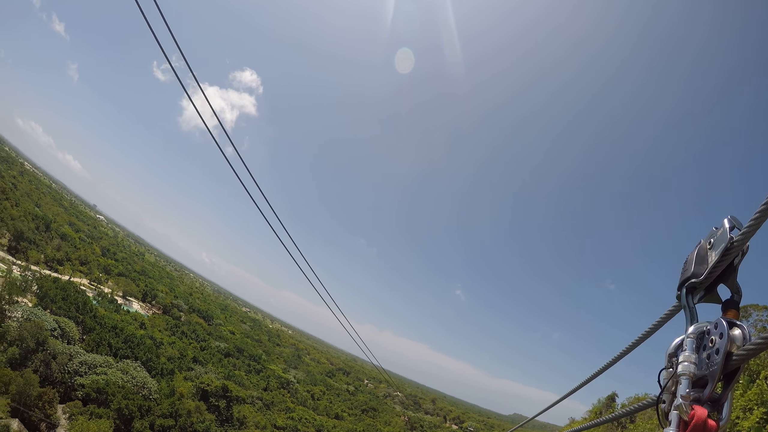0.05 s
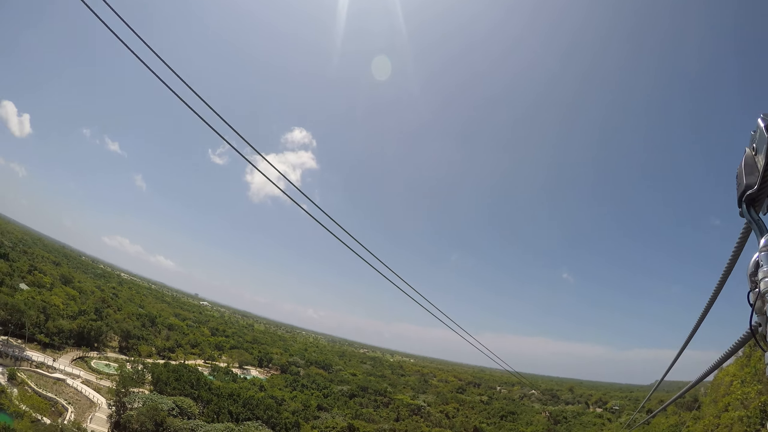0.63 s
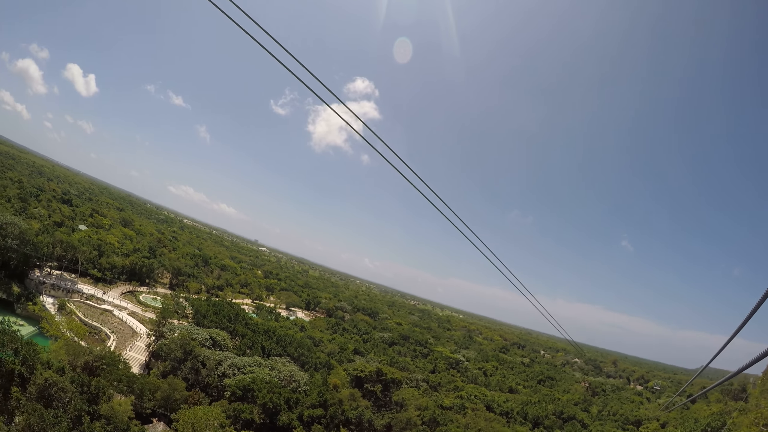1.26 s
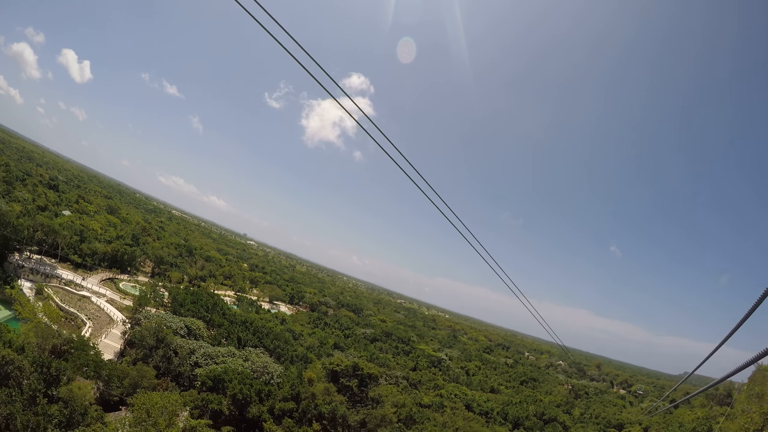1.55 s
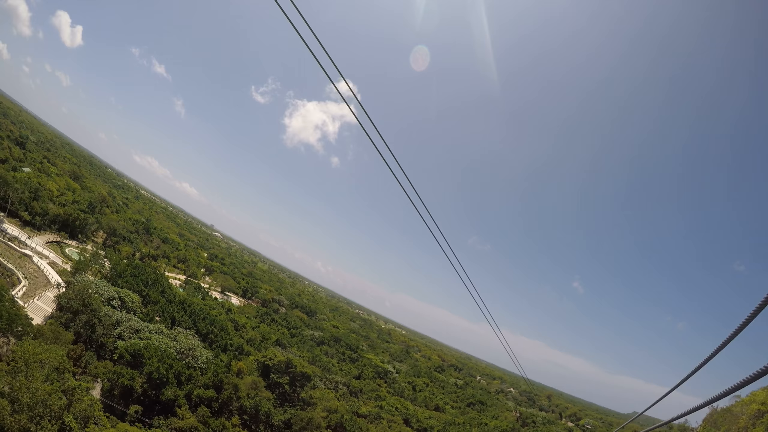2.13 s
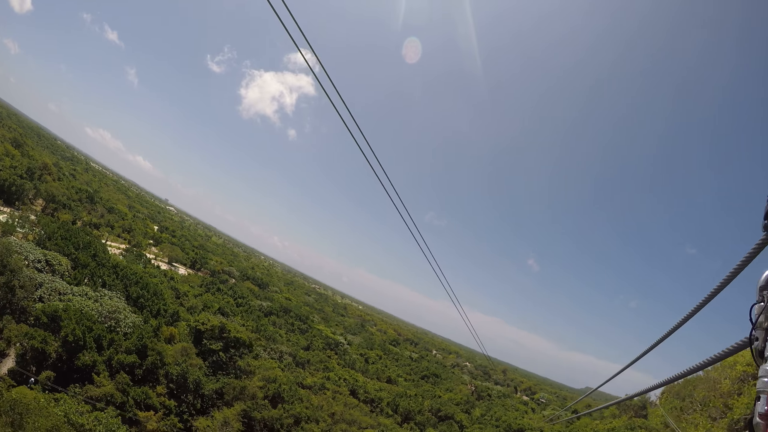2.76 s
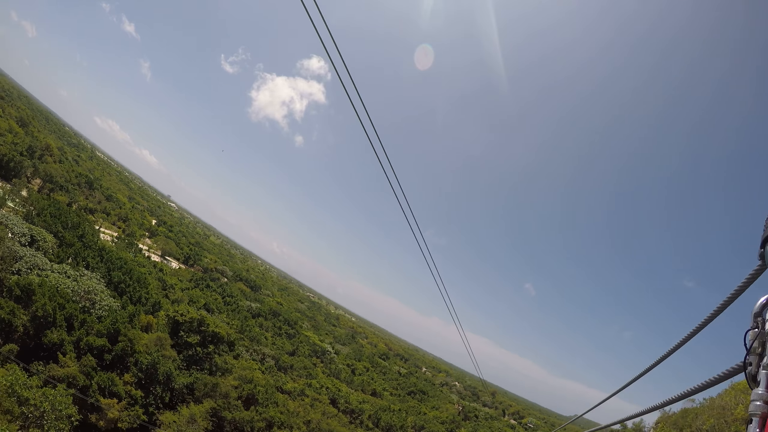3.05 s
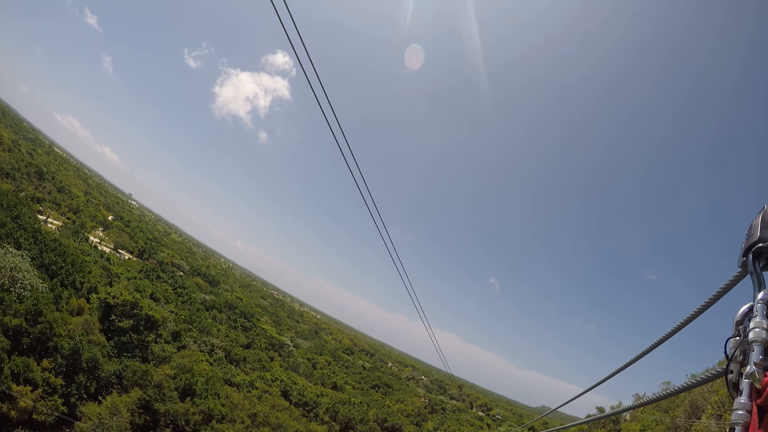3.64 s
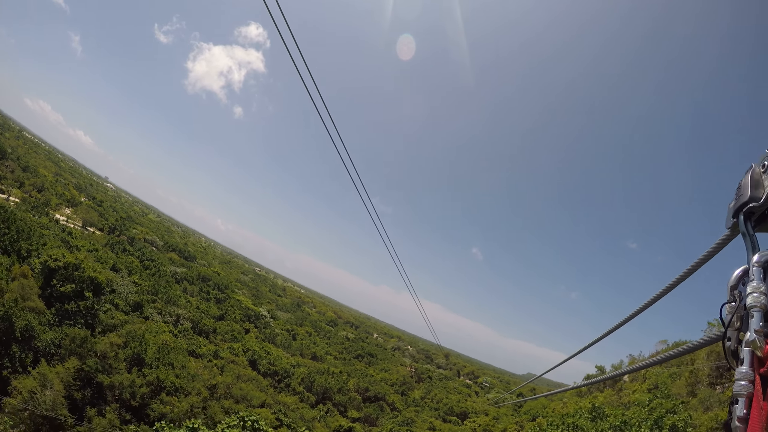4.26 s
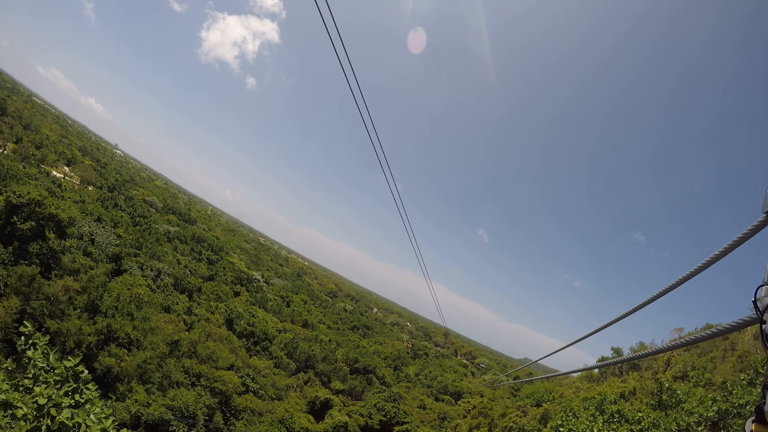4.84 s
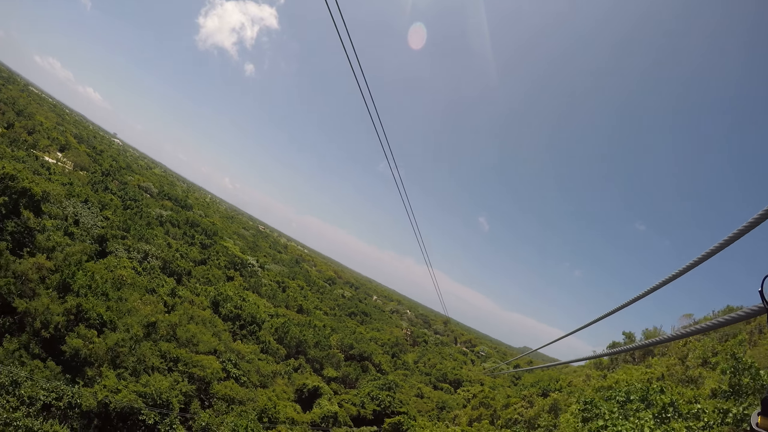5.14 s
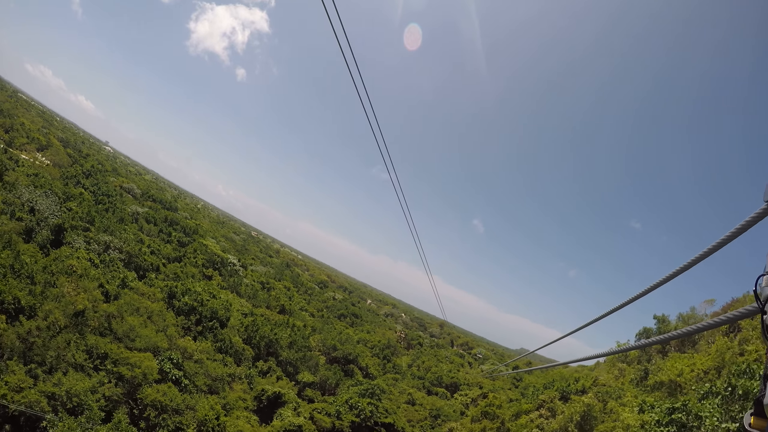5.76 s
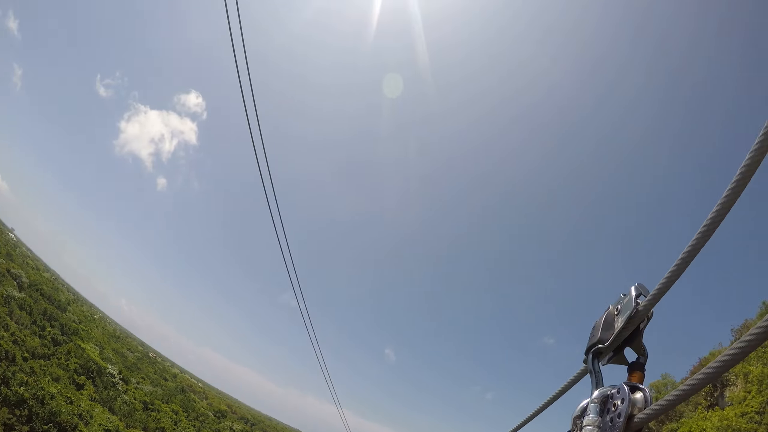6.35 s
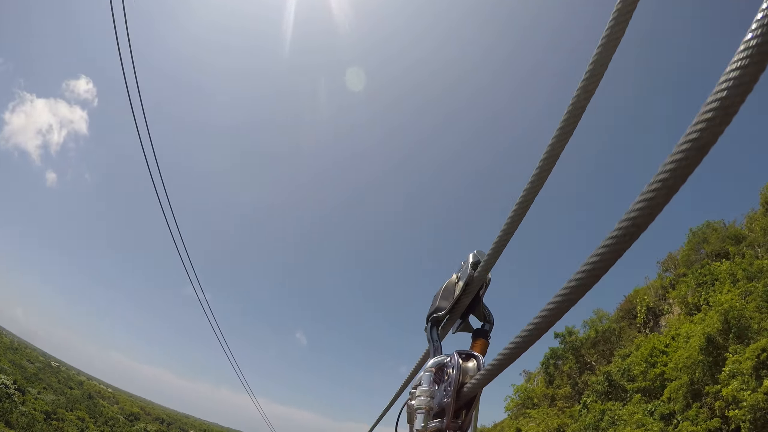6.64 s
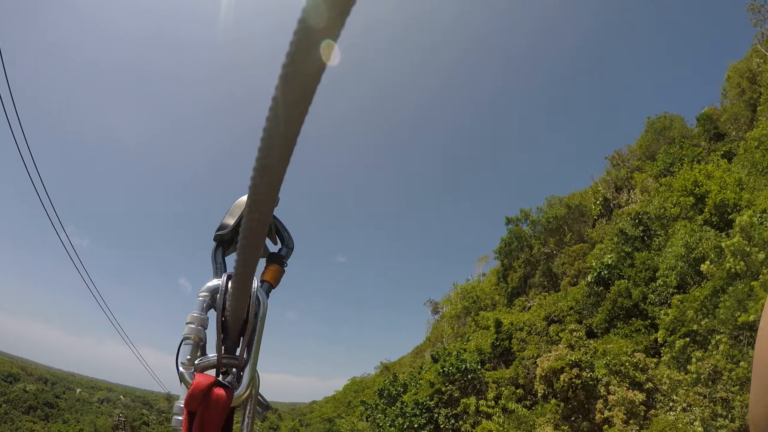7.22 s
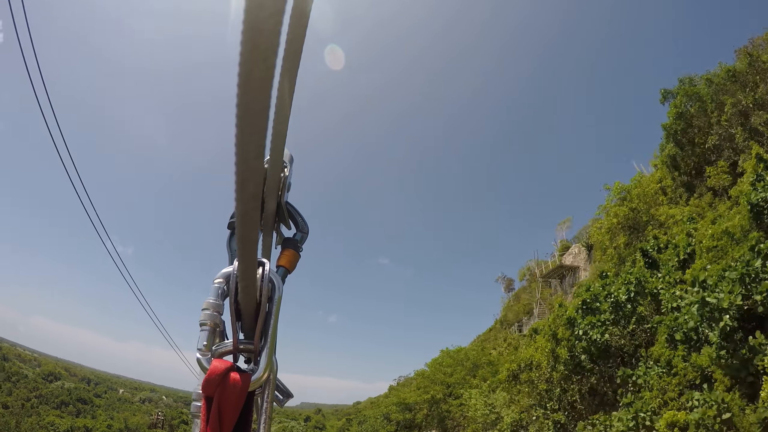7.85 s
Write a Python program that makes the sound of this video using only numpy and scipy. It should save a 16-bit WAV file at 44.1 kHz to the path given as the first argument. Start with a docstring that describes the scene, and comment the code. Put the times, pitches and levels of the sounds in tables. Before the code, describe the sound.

A zip line trolley rolls fast along a steel cable, making a loud, continuous, hissing metallic whirr. A thin, faint note rises in pitch as it gathers speed. After about a second, wind starts to thump and rush in uneven gusts on the rider's helmet microphone. Near the end the whirr shifts in tone as the head turns toward the pulley. The sound is close and outdoors.

```python
"""On a zip line, a rider gathers speed. The trolley's wheels roll on a cable of twisted steel strands
and shake the trolley's frame, which whirrs. The passing strands also sing a faint rising note over
the drone of the taut cable. A helmet camera swings round to face the trolley, which changes the
whirr's tone, while the wind thumps and rushes on its single microphone."""
import sys
import numpy as np
from scipy.fft import rfft, irfft, next_fast_len
from scipy.io import wavfile
from scipy.ndimage import uniform_filter1d, map_coordinates

SR = 44100
rng = np.random.default_rng(int(sys.argv[2]) if len(sys.argv) > 2 else 0)


def log_audio(samples):
    """Write samples as a 16-bit WAV file to the path given in sys.argv[1]."""
    # one column per channel
    frames = np.atleast_2d(samples).T
    # limit to full scale, then quantise
    limited = np.clip(frames, -1, 1)
    pcm = np.round(limited * 32767).astype(np.int16)
    wavfile.write(sys.argv[1], SR, pcm)


N = 347949

# Where the trolley is as the head turns. Each row: time in seconds, degrees to the right of the lens.
TROLLEY_ANGLE = [(0, 50), (.45, 62), (1, 69), (2.3, 68), (3.1, 64.5), (4, 53.5), (4.4, 57.5), (5, 61.5),
                 (5.7, 61.5), (6, 58), (6.25, 52), (6.5, 27), (6.66, 13), (6.86, 6), (7.02, -8),
                 (7.25, -15)]


def trolley(strands):
    """The rolling wheels shake the frame into a whirr, whose highest hiss sputters a little."""
    full_db, start_drop_db, build_seconds = -16.5, 2.5, 0.37
    whirr_db = full_db - start_drop_db * (1 - ramp(0, build_seconds))
    force = rolling_wheels(strands) + fine_wires(strands)
    whirr = helmet_echo(whirr_swells(ringing_frame(force)))
    hiss = filtered(whirr, lambda hz: 1 - 1 / (1 + (hz / 11000) ** 24))
    sputter_db = wobble(130) + .4 * wobble(25)
    return amp(whirr_db) * (whirr + hiss * (amp(sputter_db) - 1))


def rolling_wheels(strands):
    """The wheels feel ever new bumps on the cable, plus their own marks that come round each turn."""
    marks_share, tick_db, ticks_per_second = .17, -13.5, 300
    marks = np.zeros(N)
    for strands_per_turn in (12, 12 + 1 / np.pi):  # two wheels, slightly unequal
        rim = rng.standard_normal(576)
        place_on_rim = strands / strands_per_turn % 1 * len(rim)
        marks += map_coordinates(rim, [place_on_rim], mode="grid-wrap")
    bumps = np.sqrt(marks_share) * unit(marks) + np.sqrt(1 - marks_share) * rng.standard_normal(N)
    # Single wires tick under the wheel, and the load flutters.
    ticks = rng.standard_normal(N) * (rng.random(N) < ticks_per_second / SR)
    load_db = 0.49 * wobble(350) + 0.34 * wobble(25)
    return unit((bumps + amp(tick_db) * unit(ticks)) * amp(load_db))


def fine_wires(strands):
    """The fine wires in each strand pass under the wheels, adding fuzzy tones that rise with speed."""
    # Each row: pitch as a multiple of the strand rate, width in Hz, level in dB within the wheels' force.
    tones = [(2, 24, -31), (2.48, 26, -35), (3.22, 55, -26), (4.11, 60, -30.5), (4.3, 110, -25),
             (4.95, 45, -31)]
    force = np.zeros(N)
    for multiple, width, db in tones:
        level = amp(db + 1.4 * wobble(width + 8))
        force += level * np.sin(2 * np.pi * multiple * strands + 0.62 * wobble(2 * width))
    return force


def ringing_frame(force):
    """The frame rings at its own pitches; how strongly each is heard depends on the trolley's angle."""
    # Five angles of the trolley, in degrees to the right of the lens.
    angles = [-19, 6, 28, 50, 74]
    # The frame's rings. Each row: pitch in Hz, width in Hz, then relative level in dB at each angle.
    rings = [(933, 360, -31.5, -20.5, -31, -24, -27.5), (1068, 140, -46, -39, -30, -29, -32),
             (1435, 350, -31.5, -22, -25, -29.5, -35), (1707, 310, -21, -23, -30, -25, -28),
             (1962, 190, -15.5, -24, -23, -25, -26), (2163, 174, -14, -21, -18, -21, -18.5),
             (2340, 200, -10.5, -13, -19, -20.5, -19), (2714, 790, -9.5, -13.5, -19, -17.5, -15.5),
             (3108, 330, -6.5, -5, -16, -14.5, -29), (3422, 300, -6.5, -4, -8, -7.5, -12),
             (3660, 296, -15, -15, -10, -6, -5.5), (3900, 340, -27, -11, -5.5, -8.5, -11),
             (4255, 790, -6.5, -9.5, -22.5, -15.5, -15), (5070, 1020, -6.5, -9.5, -6.5, -14.5, -9),
             (5502, 490, -5.5, -15, -6, -9.5, -2.5), (6233, 570, -26, -15, -16, -6, -8),
             (6680, 510, -11.5, -23, -10, -25, -33), (7010, 540, -20, -7.5, -12, -13.5, -15.5),
             (7700, 1300, -34, -9, -29, -18.5, -17), (8640, 870, -19, -31, -26, -13.5, -20.5),
             (9280, 560, -25, -30, -13.5, -15, -40), (10030, 700, -27, -21, -28, -18, -26.5),
             (10490, 610, -23, -26, -24, -25.5, -26), (11370, 990, -27, -28.5, -32, -40, -39),
             (12200, 1330, -31, -27.5, -26, -25.5, -30), (13180, 540, -29, -31, -33, -39, -43),
             (14700, 1690, -32, -31, -22, -29, -30)]
    angle, = curves(TROLLEY_ANGLE)
    centre, width, *levels = np.transpose(rings)

    def response(hz):
        power = amp(levels) ** 2 / width @ resonance(hz, centre[:, None], width[:, None])
        return np.sqrt(power / power.mean(axis=1, keepdims=True))

    # Blend the sounds for the two nearest angles.
    shares = np.array([np.interp(angle, angles, side) for side in np.eye(len(angles))])
    return np.sum(shares * filtered(force, response), axis=0)


def whirr_swells(whirr):
    """Three bands of the whirr, near 2.2, 3.65 and 5.4 kHz, swell and fade."""
    # The three bands. Each row: centre in Hz, width in Hz.
    bands = [(2200, 830), (3650, 800), (5400, 1200)]
    # Each row: time in seconds, then the boost in dB of the lower, middle and upper band.
    boosts = [(0, 3, 1.2, 0), (.7, 4, 0, -1.8), (.95, 0.8, -0.8, 1.5), (1.17, 1.5, 1.8, -2.5),
              (1.5, 1.5, -3.3, 3), (1.78, 4.5, -0.5, 0.3), (2.3, 0, -1, 0.5), (3.1, -1, 0, .5),
              (3.85, 1.5, 0.5, -.5), (4.15, -1.5, 0.5, .5), (4.7, -1, 1.9, 0), (5.1, 2, 0.2, .5),
              (6.1, -0.5, -.3, 0), (6.6, .3, 0, 2), (7.89, -3, -0.5, -.5)]
    change = np.zeros(N)
    for (centre, width), boost_db in zip(bands, curves(boosts)):
        band = filtered(whirr, lambda hz: resonance(hz, centre, width))
        change += (amp(boost_db + 0.36 * wobble(7)) - 1) * band
    return whirr + change


def helmet_echo(whirr):
    """An echo off the helmet weakens some pitches, and these shift as the head turns."""
    # Each row: trolley angle in degrees, echo delay in seconds, echo strength as a share of the whirr.
    echoes = [(-18, 0.00091, 0.17), (11, 0.00099, 0.12), (30, 0.00113, 0.11), (60, .00135, 0.044),
              (74, 0.0014, 0.098)]
    angle, = curves(TROLLEY_ANGLE)
    angles, delays, strengths = np.transpose(echoes)
    echo = map_coordinates(whirr, [np.arange(N) - SR * np.interp(angle, angles, delays)])
    strength = np.interp(angle, angles, strengths)
    return (whirr + strength * echo) / np.sqrt(1 + strength ** 2)


def wind(rate):
    """Big swirls of air thump the microphone; mid-sized eddies and a fluttering rush lie above them."""
    # The tone of each layer. Each row: frequency in Hz, relative level in dB.
    thump_tone = [(10, -32), (20, -1), (30, -2), (40, 1), (55, -2), (80, -8.5), (110, -16.5), (200, -35),
                  (500, -92)]
    eddy_tone = [(40, -38), (78, -4), (110, -1), (160, -2), (220, -7), (320, -18), (600, -38), (2000, -90)]
    rush_tone = [(120, -33), (220, -2.5), (290, -0.5), (400, -5.5), (550, -11.5), (900, -12), (1500, -17.5),
                 (4000, -43), (15000, -70)]
    # Each holds: level in dB at cruising speed, dB gained per dB of speed, change in dB when sheltered.
    thump_law = (-22.8, 0.89, -8.5)
    eddy_law = (-32.5, 1.2, -6.5)
    rush_law = (-39.8, 1.13, -7)
    # Each row: peak time in seconds, length in seconds, change of the thumps in dB, of the rush in dB.
    gusts = [(1.55, 0.65, 5, -2.5), (2.095, 0.47, 7.5, 1.5), (2.78, 0.21, 6.5, 1.5), (3.35, 0.34, 1, 3.5),
             (3.72, .22, 4, -0.5), (3.93, 0.56, 2.5, 4), (4.298, 0.24, 3.5, 1), (5.088, 0.35, 5, 5),
             (5.73, 0.84, 3.5, 7), (6.4, 0.2, 3, -1), (6.913, 0.3, 10, 3.5), (7.43, 0.4, 7.5, -0.5),
             (7.804, 0.17, 7, -1)]
    low_gust_db = sum(db * swell(time, length) for time, length, db, _ in gusts)
    high_gust_db = sum(db * swell(time, length) for time, length, _, db in gusts)
    angle, = curves(TROLLEY_ANGLE)
    turn_db = 0.07 * (angle - 46.6)  # more rush as the head turns from the trolley into the wind
    thump_db = airflow_db(thump_law, rate) + low_gust_db
    eddy_db = airflow_db(eddy_law, rate) + 0.34 * low_gust_db + 0.72 * high_gust_db
    rush_db = airflow_db(rush_law, rate) + high_gust_db + turn_db
    thumps = noise(thump_tone)
    thump_power = np.abs(uniform_filter1d(thumps ** 2, SR // 10))
    thumps /= np.sqrt(thump_power + 0.011)  # swirls break away at a fairly even strength
    flutter = wobble(26)
    eddies = amp(eddy_db + 1.3 * flutter) * noise(eddy_tone)
    rush = amp(rush_db + 0.75 * flutter) * noise(rush_tone)
    return amp(thump_db + 1.3 * wobble(16)) * thumps + eddies + rush


def airflow_db(law, rate):
    """Between gusts, the wind grows with speed; it is weaker in the shelter at the start."""
    cruise_db, growth, shelter_db = law
    sheltered = 1 - ramp(start=1.11, length=0.18)
    return cruise_db + growth * speed_db(rate) + shelter_db * sheltered


def cable_note(strands, rate):
    """The passing strands sing one thin, uneven note that rises with speed."""
    # The note's swells. Each row: peak time in seconds, rise in dB.
    swells = [(.1, 10), (.57, 10), (1.55, 6), (1.92, 8.5), (2.47, 9), (3.2, 10), (4.3, 11.5), (5.15, 7),
              (6.05, 6), (6.45, 8.5), (6.88, 10), (7.38, 8), (7.83, 10)]
    swell_db = sum(db * swell(time, length=.3) for time, db in swells)
    note_db = -53.2 + 1.1 * speed_db(rate) + swell_db
    waver = (wobble(14) + 1j * wobble(15)) / np.sqrt(2)  # each stretch of cable sings differently
    return amp(note_db) * np.real((1 + .25 * waver) * np.exp(2j * np.pi * strands))


def cable_drone():
    """The taut cable and the rider's strap drone steadily under the load."""
    # Each row: pitch in Hz, width in Hz, level in dB.
    hums = [(69.7, 32, -32.5), (159, 57, -42), (381, 56, -50.5), (577, 460, -50)]
    drone = np.zeros(N)
    for centre, width, db in hums:
        hum = filtered(rng.standard_normal(N), lambda hz: np.sqrt(resonance(hz, centre, width)))
        drone += amp(db) * unit(hum)
    return drone


def strand_rate():
    """Strands passing per second: gravity speeds the rider up, less and less as the cable flattens."""
    start_rate, start_gain_per_second, flattening_per_second = 450.3, 99.5, .0837
    t = np.arange(N) / SR
    return start_rate + start_gain_per_second * t * (1 - flattening_per_second * t / 2)


def speed_db(rate, cruise_rate=800):
    """Speed compared with cruising speed, in dB."""
    return 20 * np.log10(rate / cruise_rate)


def amp(db):
    """Turn decibels (dB) into a factor to multiply by."""
    return 10 ** (np.asarray(db) / 20)


def unit(x):
    """Scale a signal to an average power of 1."""
    return x / np.sqrt(np.mean(x ** 2) + 1e-20)


def curves(rows):
    """Join timed rows with straight lines: one curve for each column after the time."""
    times, *columns = np.transpose(rows)
    return [np.interp(np.arange(N) / SR, times, column) for column in columns]


def wobble(per_second):
    """A smooth curve through this many random points a second."""
    points = rng.standard_normal(int(N * per_second / SR) + 4)
    return unit(map_coordinates(points, [np.arange(N) * per_second / SR]))


def swell(time, length):
    """A bell-shaped rise to 1 at the given time, above half height for length seconds."""
    return .5 ** ((2 * (np.arange(N) / SR - time) / length) ** 2)


def ramp(start, length):
    """A straight rise from 0 to 1, with start and length in seconds."""
    return np.clip((np.arange(N) / SR - start) / length, 0, 1)


def resonance(hz, centre, width):
    """A steep-sided peak that favours the frequencies near its centre."""
    offset = (hz ** 2 - centre ** 2) / ((hz + 1) * width)
    return 1 / (1 + offset ** 2) ** 2


def filtered(x, response):
    """Multiply each frequency in x by response(hz)."""
    size = next_fast_len(N + SR // 2)
    hz = np.fft.rfftfreq(size, 1 / SR)
    return irfft(rfft(x, size) * response(hz), size)[..., :N]


def noise(tone):
    """Noise of power 1, shaped by rows of frequency in Hz and relative level in dB."""
    points_hz, db = np.transpose(tone)
    white = rng.standard_normal(N)
    return unit(filtered(white, lambda hz: amp(np.interp(np.log(hz + 1), np.log(points_hz), db))))


def scene():
    """Trolley, cable and wind at one microphone, the same in both ears."""
    rate = strand_rate()
    strands = np.cumsum(rate) / SR  # how many strands have passed so far
    mono = trolley(strands) + cable_note(strands, rate) + cable_drone() + wind(rate)
    return np.array([mono, mono])


def record(dry):
    """The camera rounds off the tallest peaks and cuts the very highest treble."""
    ceiling, top_hz = .92, 15280
    rounded = dry / (1 + np.abs(dry / ceiling) ** 10) ** (1 / 10)
    return filtered(rounded, lambda hz: hz < top_hz)


dry = scene()
out = record(dry)
log_audio(out)
```